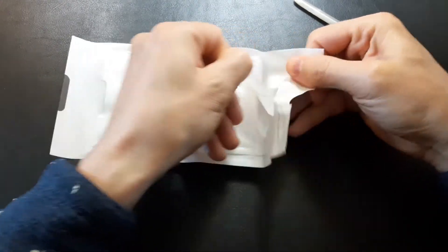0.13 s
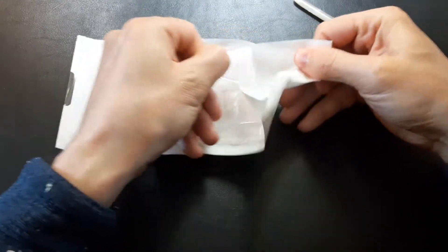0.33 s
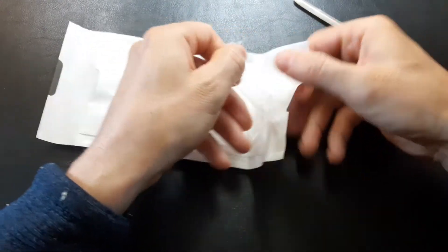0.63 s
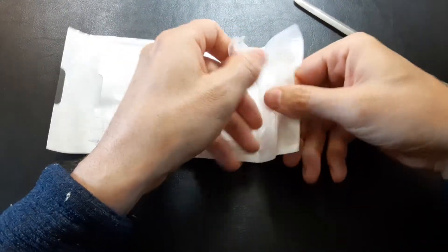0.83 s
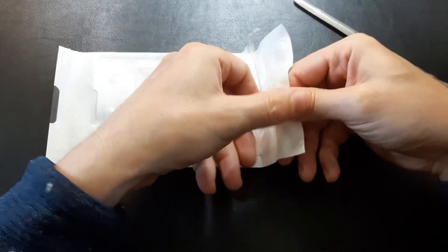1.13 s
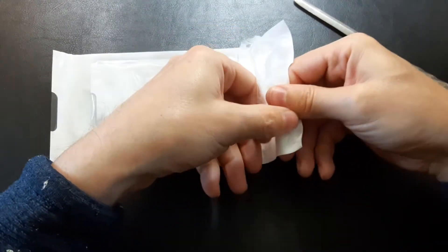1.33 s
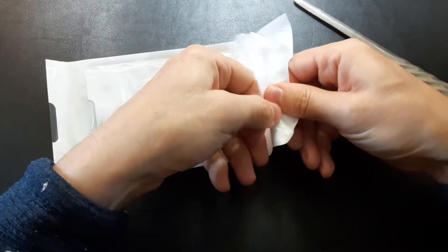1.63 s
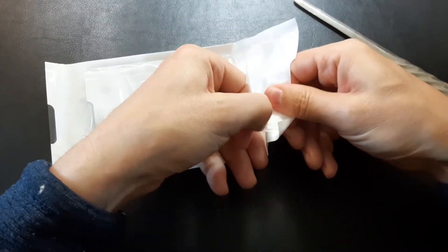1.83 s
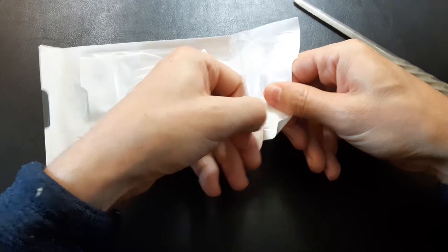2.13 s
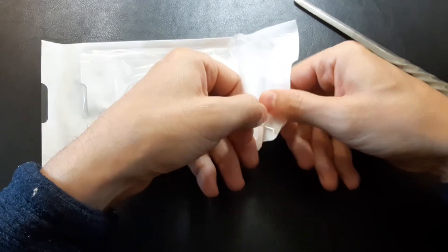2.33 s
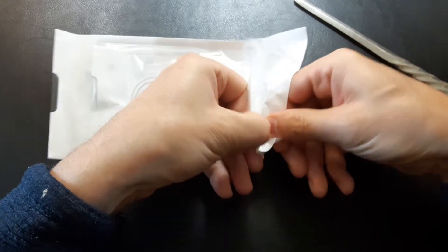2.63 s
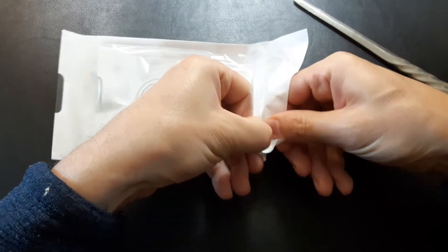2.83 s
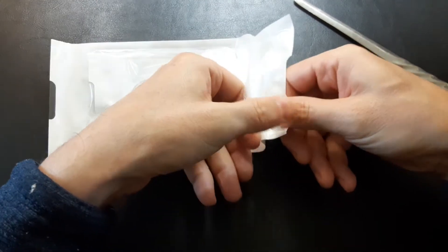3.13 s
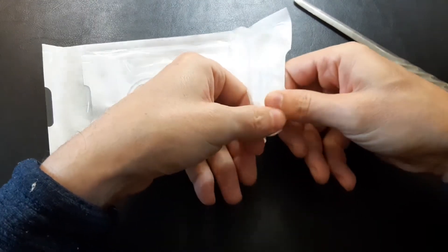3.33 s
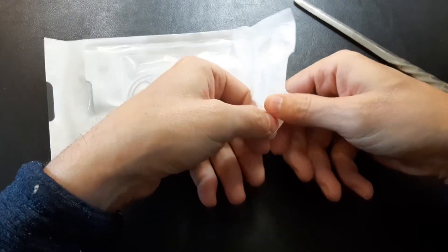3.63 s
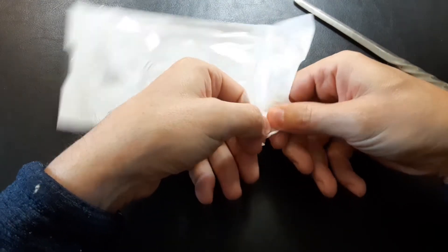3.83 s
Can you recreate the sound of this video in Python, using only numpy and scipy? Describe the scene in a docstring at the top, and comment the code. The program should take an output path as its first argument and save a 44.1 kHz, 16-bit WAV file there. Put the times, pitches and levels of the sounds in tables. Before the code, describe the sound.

A paper and plastic pouch is peeled open close to a stereo microphone in a small room. A loud, dense, bright ripping crackle fills 0 to 0.4 s, with low desk knocks, and a weaker tear follows at 0.5-0.7. Then come quiet finger rustles and sparse dry snaps, small crinkling bursts around 1.7-1.85, 2.3 and 2.5-2.65, and faint ticks and paper rubbing until 4 s, over a very faint steady hush.

```python
"""Peeling a sterile pouch

Two hands peel a paper and plastic pouch open over a desk in a small room. The seal tears in dense runs
of tiny noise bursts. The stiff film snaps in short bursts and pops in brief tones; fingers slide over
the paper as grainy hiss, flaps sing as narrow noise, and the desk knocks in low fading tones.
A short room echo and a faint steady hush lie behind it all."""
import sys
import numpy as np
from scipy import signal
from scipy.fft import rfft, irfft
from scipy.io import wavfile

SR = 44100
rng = np.random.default_rng(int(sys.argv[2]) if len(sys.argv) > 2 else 0)


def generate_wav(sig):
    """Save sig (samples, or channels by samples) to the path in sys.argv[1] as 16-bit PCM at SR."""
    pcm = np.round(np.clip(np.atleast_2d(sig).T, -1, 1) * 32767).astype(np.int16)
    wavfile.write(sys.argv[1], SR, pcm)


N = 176400
TIME = np.arange(N) / SR
EDGES_HZ = 70 * 2 ** (np.arange(17) / 2)   # half-octave band edges

# pulls on the seal, one curve each: [t/s, level of the tearing/dB]
SEAL_PULLS = [
    [(.015, -80), (.032, -42.5), (.075, -26), (.11, -34.5), (.18, -31), (.2, -60), (.235, -33.5),
     (.262, -52), (.305, -28), (.375, -31), (.4, -52)],
    [(.505, -72), (.515, -38.5), (.545, -48.5), (.6, -46.5), (.64, -70)],
    [(1.63, -63), (1.69, -43), (1.742, -36), (1.775, -39.5), (1.82, -51), (1.85, -71)],
    [(2.23, -61), (2.295, -55), (2.33, -68)],
    [(2.52, -47), (2.54, -67), (2.585, -52.5), (2.63, -44.5), (2.66, -89)],
    [(3.0, -73), (3.055, -63), (3.11, -51), (3.16, -64), (3.2, -62)],
]
# colour of the tearing: [f/Hz, level per half octave/dB]
TEAR_COLOUR = [(83, -69), (166, -51), (235, -20), (333, -15.5), (470, -15), (666, -17), (940, -0.5),
               (1330, 4), (1880, -1), (2660, 7), (3770, 7), (5330, 4.5), (7530, -12), (10650, 10.5),
               (15000, 3)]
# low rumble of the handled pouch: [f/Hz, level per half octave/dB]
RUMBLE_COLOUR = [(83, -9.5), (117, -23), (166, -2), (235, -24), (333, 7.5), (470, 6), (940, 4), (3000, -47)]
FIBRES_PER_S, FIBRE_SPREAD_DB, FIBRE_DECAY_S = 1500, 3.8, .0008
PATCHES_PER_S = 14   # how fast the colour of the paper noise shifts

# the film buckles: [t/s, level/dB, body re level/dB, treble re level/dB, decay at 4 kHz/s,
# left minus right/dB]; the levels come before the shared trim, weights, scatter and colour below
FILM_SNAPS = [(0.0246, -41, -35, 10, 0.00041, -1), (0.0651, -27, -13, -4, 0.0025, 4),
              (0.0739, -20, -16, -0.5, 0.00083, 0), (0.0942, -23, -0.5, 2.5, 0.0019, 4.5),
              (0.1211, -21.5, -14, 1, 0.001, -2.5), (0.1342, -35, 0, 2, 0.0025, 7),
              (0.1661, -35, 5.5, 3.5, 0.0034, 5), (0.177, -43.5, 17.5, 5, 0.0033, 0),
              (0.2142, -28.5, -1.5, 0.5, 0.0023, -1.0), (0.225, -31, -32, -3, 0.00083, 0),
              (0.233, -41, 0, 6, 0.0025, -2), (0.2379, -29.5, -16, 6, 0.0012, -0.5),
              (0.272, -33.5, 2.5, 3.5, 0.0047, 0), (0.2938, -23.5, -8.5, -1, 0.0049, 1),
              (0.2996, -47, -9, 10, 0.0015, -1.0), (0.311, -27.5, -25, 3.5, 0.0024, -2),
              (0.3181, -26, -14, -8, 0.0016, -4), (0.3505, -23, -30, -4, 0.004, -1),
              (0.362, -26.5, -18, 0.5, 0.0011, 1), (0.3694, -35, -35, 7, 0.0033, -8),
              (0.3814, -21.5, 2, -1, 0.0034, -0.5), (0.3825, -26.5, -6, -35, 0.0025, 6),
              (0.4962, -44, -2, -9, 0.00075, 4), (0.5084, -30, -3, -24, 0.0024, 0.5),
              (0.5131, -41.5, 0, 7, 0.002, -1), (0.5287, -38, -6, 0, 0.00054, 6),
              (0.5616, -32, -4.5, 10, 0.00085, 3), (0.592, -41, 9, -5.0, 0.0027, 2),
              (0.5991, -37.5, -3, 9, 0.00097, -1), (0.627, -37.5, -41, -0.5, 0.0011, 4),
              (0.7063, -33.5, -26.5, -3.5, 0.00024, -1.5), (1.0451, -50.5, 0, -2.5, 0.0013, -1),
              (1.076, -40.5, -38, -2.5, 0.0015, -2.5), (1.0802, -49, -2, 0, 0.0035, 4),
              (1.1869, -42, -6.5, 2, 0.0018, 0), (1.205, -37, -11.5, 0.5, 0.0025, 1.5),
              (1.2682, -47.5, -5.5, 5, 0.0013, 2), (1.2876, -47.5, -32, -1, 0.0009, 3),
              (1.3009, -38, -10, -4, 0.0009, 1), (1.3185, -51, -3, -4, 0.0008, 1),
              (1.3338, -35.5, -17, -4.5, 0.0014, 1.5), (1.3787, -44.5, -13, 6.5, 0.0013, 0.0),
              (1.405, -39, -11.5, 5.5, 0.0016, 3), (1.4139, -33.5, -20.5, 3.5, 0.00086, 2.5),
              (1.4437, -46.5, -16, -8, 0.0006, 3), (1.4832, -31.5, -32, 5, 0.0014, 0.5),
              (1.6436, -38, -8.5, 0.5, 0.0007, 0.5), (1.7033, -32.5, -8, 9, 0.0013, 0),
              (1.729, -37.5, 3, 8.5, 0.0027, 1), (1.7343, -40, 7.5, 4, 0.0031, 2),
              (1.7489, -35.5, 1.5, -3, 0.0022, -1), (1.8067, -35, -5.5, 0.5, 0.00067, 3),
              (1.8191, -40.5, -2, -5, 0.00072, 0), (1.8433, -44.5, -5, -3, 0.00099, 7),
              (1.8559, -29, -17.5, 4.5, 0.00089, 0), (1.9071, -43, -20, -14, 0.0009, 2),
              (2.0155, -33.5, -21.5, -1.5, 0.00057, 2), (2.1902, -45, -9, -4, 0.0009, -1),
              (2.2358, -39.5, -18, 2.5, 0.00071, 1), (2.2569, -45, -14, 7.5, 0.0006, 6),
              (2.2705, -42.5, 2.5, -3, 0.00065, 1.5), (2.3021, -40.5, 4.5, 3.5, 0.0018, 0),
              (2.4715, -37, -34, -12, 0.0022, 2), (2.4946, -44, -5, 0, 0.00042, 0),
              (2.5246, -28, -12.5, 6, 0.0012, 0), (2.533, -23.5, -20, -6, 0.0017, 1),
              (2.5423, -36.5, -1.5, -3, 0.0016, 1.5), (2.5799, -31.5, -11, 8.5, 0.00097, -0.5),
              (2.6546, -41.5, -21, -41, 0.0017, 3), (2.7126, -36.5, -43, 0, 0.0021, -4),
              (2.7164, -39.5, -42, 3.5, 0.00031, 9), (2.7493, -44, -4.5, -1, 0.0029, 3.0),
              (2.9398, -43.5, -13, -20, 0.0023, 2), (2.9755, -43.5, -20, 3, 0.00051, -2),
              (2.9812, -40, -11, -7, 0.0025, 5.5), (3.0144, -49.5, 3, 0, 0.0015, 4),
              (3.0378, -58.5, -15, 23.5, 0.0008, -2.0), (3.051, -47, 8.5, 10, 0.0047, 2.0),
              (3.077, -35.5, -7.5, -6, 0.0014, -2), (3.1175, -46.5, -2.5, -1, 0.0024, 4),
              (3.1403, -45, -3.0, -7, 0.00068, 2), (3.1589, -41, -7.5, -24, 0.0012, 2.5),
              (3.1724, -42, -5, 1.5, 0.00095, 0), (3.3162, -47.5, -9, -32, 0.0019, 2),
              (3.3552, -43.5, -6, -29, 0.00062, -3), (3.3835, -40, -14, -51, 0.0011, 2),
              (3.5424, -39, -7, -7, 0.0048, 0.5), (3.662, -51.5, -2.5, -15, 0.0025, 1),
              (3.8525, -52, 5.5, -9, 0.00078, 6), (3.8719, -55, -1, 24, 0.00051, 0),
              (3.8921, -35.5, -4.5, -39, 0.0008, 2)]
# colour shared by all snaps: [f/Hz, level per half octave/dB]
SNAP_COLOUR = [(83, -44.5), (235, -27), (470, -16.5), (666, -17), (940, -3), (1330, -4.5), (1880, -4),
               (2660, -7), (3770, -3), (5330, -3), (7530, -9), (10650, -2), (15000, -5.5)]
# the sheet rings on after the crack, less so in the treble: [f/Hz, level re crack/dB]
SNAP_RING = [(900, -10), (3500, -10.5), (12000, -13.5)]
# how much of a snap's body and treble figures each pitch takes: [f/Hz, weight]
BODY_WEIGHT = [(1000, 0.92), (2500, 0.0023)]
TREBLE_WEIGHT = [(4500, 0.0014), (10000, 1)]
SNAP_TRIM_DB, SNAP_SPAN_S = -1, 0.004   # loudness is averaged (rms) over this span
SNAP_RING_S, SNAP_SCATTER_DB = 0.0038, 1
CRACK_SHORTENING = 0.086   # higher bands of a crack die sooner: exponent on frequency
CLICK_DB = 7   # the instant of the flip stands out of its crack

# a taut patch of the pouch flips and rings: [t/s, f/Hz, level/dB, time to fade by 60 dB/s]
FILM_POPS = [(0.2374, 11700, -10.5, .003), (0.3827, 1490, -21.5, 0.02), (.9582, 13700, -34, 0.0036),
             (0.9763, 2340, -41.5, 0.025), (1.0208, 1920, -43.5, 0.0075), (1.1333, 955, -38.5, 0.0027),
             (1.17, 2240, -41, .004), (1.4833, 14200, -8, 0.0032), (1.598, 840, -50, 0.02),
             (2.0155, 3450, -34, 0.013), (2.3025, 885, -26, 0.0095), (2.75, 1740, -31, 0.004),
             (3.543, 2595, -38, 0.027), (3.543, 4400, -39.5, 0.018), (3.978, 1490, -27.5, 0.0032)]

# fingers and flaps slide over the paper: [t/s, level/dB]
SLIDING = [(0, -59), (.1, -34), (.37, -55.5), (.44, -49), (.49, -63), (.57, -48.5), (.66, -50),
           (.71, -52.5), (.82, -55.5), (.87, -54), (.94, -68), (.99, -62), (1.07, -61.5), (1.15, -76),
           (1.2, -57.5), (1.26, -58.5), (1.33, -61), (1.37, -61), (1.45, -57.5), (1.59, -59), (1.73, -60),
           (1.88, -53), (1.96, -62.5), (2.08, -62.5), (2.18, -54), (2.22, -62.5), (2.29, -45.5),
           (2.35, -59.5), (2.42, -66.5), (2.49, -54), (2.58, -49.5), (2.69, -62), (2.76, -58.5),
           (2.855, -71.5), (2.89, -54.5), (2.95, -55.5), (3.0, -62), (3.05, -44), (3.1, -58), (3.17, -60),
           (3.23, -67), (3.29, -66.5), (3.32, -54), (3.38, -56.5), (3.45, -70), (3.485, -57),
           (3.515, -53.5), (3.53, -69), (3.6, -66.5), (3.665, -60), (3.715, -69), (3.76, -56),
           (3.83, -49.5), (3.885, -42), (3.95, -55), (4.0, -49)]
# colour of the sliding: [f/Hz, level per half octave/dB]
SLIDE_COLOUR = [(83, -42.5), (235, -16.5), (470, -14.5), (666, -18), (940, -8), (1330, -8.5), (1880, -1),
                (2660, -2), (3770, 0), (5330, -1.5), (7530, -2.5), (10650, 4), (15000, 0.5)]

# a flap rubs the film and sings: [t at the middle/s, length/s, f/Hz, level before the swell/dB]
FLAP_SWISHES = [(.765, 0.14, 3950, -59), (3.488, .07, 3400, -61), (3.746, 0.095, 3300, -62)]
SWISH_Q = 13   # sharpness of the flap's resonance

# the pouch bumps the desk: [t/s, level/dB, tilt around 200 Hz/dB per octave]
DESK_BUMPS = [(0.179, -37, -11.5), (0.214, -41, 10), (0.301, -35.5, 7), (0.324, -42, 8), (.622, -46, -2),
              (0.654, -53, -2), (0.789, -44.5, 0), (1.134, -54.5, 8), (1.408, -54, 10.5), (1.744, -39.5, 7),
              (1.819, -47.5, 6.5), (2.186, -50, -3), (2.28, -47, 6), (2.58, -45, 5), (3.05, -49.5, -2),
              (3.545, -58.5, 13.5)]
# ringing tones of the desk with the pouch on it: [f/Hz, level/dB, time to fade by 60 dB/s]
DESK_MODES = [(100, -11, 0.067), (160.7, -9.5, 0.16), (348, -3.5, 0.052), (511, -9.5, 0.051)]

# likeness of the two channels: [f/Hz, likeness 0-1]
LIKENESS = [(100, 0.4), (600, 0.67), (1400, 0.69), (2800, 0.43), (5600, 0.3), (11000, 0.46)]
RIGHT_LAG_S = .00002   # the pouch lies a little nearer the left microphone

# strength of the room's echo tail: [f/Hz, level/dB]
ROOM_LEVEL = [(100, -8.5), (700, -13), (3000, -11.5), (7000, -13), (14000, -17)]
# how long the tail lasts: [f/Hz, time to fade by 60 dB/s]
ROOM_T60 = [(100, 0.36), (1000, 0.21), (4000, 0.22), (14000, 0.11)]
# early reflections: [t/s, level/dB]
ROOM_ECHOES = [(.0088, -26), (0.013, -21)]
TAIL_START_S = .008

# colour of the steady hush: [f/Hz, level per half octave/dB]
HUSH_COLOUR = [(83, -2), (166, 7.5), (333, 8), (666, 5), (1330, 13.5), (3770, -4), (7530, -11), (15000, 14)]
HUSH_DB, HUSH_DRIVE = -69.5, 0.82   # the level is for a drive of 1
CUTOFF_HZ = 16300


def tearing_seal(crinkle_db=-3, rumble_db=-21):
    """Paper fibres let go of the film in a dense crackle; the sheet crinkles and rumbles under each pull."""
    pull = sum(level_curve(points) for points in SEAL_PULLS)
    breaks = grains(FIBRES_PER_S, FIBRE_SPREAD_DB, FIBRE_DECAY_S)
    fibres = coloured(pull * breaks, TEAR_COLOUR, patchy_db=0.5)
    creases = crinkles(pull, per_s=420, spread_db=4.5, low_hz=856, high_hz=6500, cycles=10.0, pan_db=15)
    rumble = coloured(pull, RUMBLE_COLOUR)
    return fibres + from_db(crinkle_db) * creases + from_db(rumble_db) * rumble


def film_snaps():
    """Each buckle is a crack with a brief ring of the sheet, in a colour of its own."""
    s, db, body_db, treble_db, decay_s, pan_db = np.transpose(FILM_SNAPS)
    t = TIME[:1024]
    sounds = 0
    for hz, sos in bands():
        fade_speed = (hz / 4000) ** CRACK_SHORTENING
        crack = np.exp(-t / np.maximum(decay_s, 1e-4)[:, None] * fade_speed)
        crack[:, 0] *= from_db(CLICK_DB)
        ring = from_db(at_hz(SNAP_RING, hz)) * np.exp(-t / SNAP_RING_S)
        shape = np.hypot(crack, ring)
        burst = signal.sosfilt(sos, stereo_noise(hz, shape.shape) * shape)
        # bring every burst to the same loudness before setting its level
        energy = (burst ** 2).sum(-1).mean(0)
        burst /= np.sqrt(energy / (SNAP_SPAN_S * SR))[:, None]
        own_db = body_db * at_hz(BODY_WEIGHT, hz) + treble_db * at_hz(TREBLE_WEIGHT, hz)
        scatter_db = SNAP_SCATTER_DB * rng.standard_normal(len(s))
        total_db = SNAP_TRIM_DB + db + own_db + scatter_db + at_hz(SNAP_COLOUR, hz)
        sounds = sounds + burst * from_db(total_db)[:, None]
    out = np.zeros((2, N))
    for k, start in enumerate(s):
        pan = from_db([[pan_db[k] / 2], [-pan_db[k] / 2]])
        add(out, start, sounds[:, k] * pan)
    return out


def film_pops():
    """Each flipping patch rings briefly at a pitch of its own."""
    out = np.zeros(N)
    for s, hz, db, t60 in FILM_POPS:
        add(out, s, from_db(db) * damped_sine(hz, t60))
    return out


def sliding_fingers(crinkle_db=-4, rumble_db=-19):
    """Skin and flaps rub the paper: a fine-grained hiss with small crinkles and a soft rumble."""
    slide = level_curve(SLIDING)
    rubbing = grains(per_s=3400, spread_db=2.5, decay_s=0.0006)
    hiss = coloured(slide * rubbing, SLIDE_COLOUR, patchy_db=2.2)
    creases = crinkles(slide, per_s=100, spread_db=5.0, low_hz=886, high_hz=6080, cycles=13, pan_db=8)
    rumble = coloured(slide, RUMBLE_COLOUR)
    return hiss + from_db(crinkle_db) * creases + from_db(rumble_db) * rumble


def flap_swishes():
    """Soft rubs swell and fade in one narrow resonance of the sheet."""
    out = np.zeros((2, N))
    for s, length_s, hz, db in FLAP_SWISHES:
        swell = np.hanning(int(length_s * SR))
        b, a = signal.iirpeak(hz, SWISH_Q, fs=SR)
        rub = signal.lfilter(b, a, stereo_noise(hz, swell.shape))
        add(out, s - length_s / 2, from_db(db) * swell * rub / rub.std())
    return out


def desk_bumps(contact_s=0.0033):
    """Soft knocks set the low modes of the desk ringing."""
    out, t = np.zeros(N), TIME[:SR // 2]
    for s, db, tilt_db in DESK_BUMPS:
        ring = 0
        for hz, mode_db, t60 in DESK_MODES:
            fading_db = db + mode_db + tilt_db * np.log2(hz / 200) - 60 * t / t60
            ring = ring + from_db(fading_db) * np.sin(2 * np.pi * hz * t)
        soft_start = 1 - np.exp(-(t / contact_s) ** 2)
        add(out, s, ring * soft_start)
    return out


def room(x):
    """A few early reflections and a short diffuse tail that mostly dies sooner in the treble."""
    t = TIME[:SR // 2]
    response = np.zeros((2, N))
    for hz, sos in bands():
        decay = from_db(-60 * t / at_hz(ROOM_T60, hz))
        tail = stereo_noise(hz, t.shape) * decay / np.sqrt(np.sum(decay ** 2))
        add(response, TAIL_START_S, from_db(at_hz(ROOM_LEVEL, hz)) * signal.sosfilt(sos, tail))
    for s, db in ROOM_ECHOES:
        add(response, s, from_db([db]))
    return signal.fftconvolve(x, response[:, :len(t)], axes=1)[:, :N]


def steady_hush():
    """A faint noise that stays at one level."""
    return from_db(HUSH_DB) * coloured(HUSH_DRIVE, HUSH_COLOUR)


def crinkles(drive, per_s, spread_db, low_hz, high_hz, cycles, pan_db):
    """Tiny creases give way at random, each with its own pitch, size and place."""
    out = np.zeros((2, N))
    for when, chance, pitch, size, side in rng.random((4000, 5)):
        if chance >= per_s * TIME[-1] / 4000:   # keep about per_s creases a second
            continue
        s, hz = when * TIME[-1], low_hz * (high_hz / low_hz) ** pitch
        size_gain = from_db(spread_db * min(-np.log(1 - size), 3))
        gain = drive[int(s * SR)] * size_gain * np.sqrt(hz / high_hz)
        pan = from_db(pan_db * (side - .5) * np.array([[1], [-1]]))
        add(out, s, gain * pan * damped_sine(hz, cycles / hz))
    return out


def damped_sine(hz, t60):
    """One mode, struck with height about 1; a small patch radiates little bass."""
    t = TIME[:int(t60 * SR) + 2]
    motion = from_db(-60 * t / t60) * np.sin(2 * np.pi * hz * t)
    return np.diff(motion, prepend=0) / (2 * np.sin(np.pi * hz / SR))


def grains(per_s, spread_db, decay_s):
    """Envelope of random tiny breaks, each with an instant attack and a short decay; rms 1."""
    sizes = from_db(spread_db * np.minimum(rng.exponential(1, N), 4))
    breaks = (rng.random(N) < per_s / SR) * sizes ** 2
    power = signal.lfilter([1], [1, -np.exp(-2 / (decay_s * SR))], breaks + 1e-18)
    return np.sqrt(power / power.mean())


def coloured(drive, colour, patchy_db=0):
    """A drive envelope shapes noise in every band, each can swell on its own; drive 1 gives rms about 1."""
    out, power = 0, 0
    for hz, sos in bands():
        gain = from_db(at_hz(colour, hz))
        share = hz * (2 ** .25 - 2 ** -.25) / (SR / 2)   # the band's part of white noise power
        swell = from_db(patchy_db * drift(PATCHES_PER_S)) if patchy_db else 1
        noise = stereo_noise(hz, (N,)) * (drive * swell + 1e-12)
        out = out + gain / np.sqrt(share) * signal.sosfilt(sos, noise)
        power += gain ** 2
    return out / np.sqrt(power)


def drift(per_s):
    """Slow smooth chance; spread about 1."""
    knots = rng.standard_normal(int(2 * per_s * TIME[-1]) + 2)
    return signal.resample(knots, N)


def stereo_noise(hz, shape):
    """White noise in two channels, as alike as they are at this frequency."""
    mid, side = rng.standard_normal((2, *shape))
    alike = np.clip(at_hz(LIKENESS, hz), 0, .99)
    mid, side = mid * np.sqrt((1 + alike) / 2), side * np.sqrt((1 - alike) / 2)
    return np.array([mid + side, mid - side])


def bands():
    """Half-octave band-passes with their centres."""
    pairs = []
    for lo, hi in zip(EDGES_HZ, EDGES_HZ[1:]):
        sos = signal.butter(2, [lo, hi], "band", fs=SR, output="sos")
        pairs.append((np.sqrt(lo * hi), sos))
    return pairs


def level_curve(points):
    """Gain along a [t/s, level/dB] curve, silent outside it."""
    s, db = np.transpose(points)
    return from_db(np.interp(TIME, s, db)) * (TIME >= s[0]) * (TIME <= s[-1])


def at_hz(points, hz):
    """Read a table on a log-frequency axis."""
    f, value = np.transpose(points)
    return np.interp(np.log(hz), np.log(f), value)


def from_db(db):
    """Decibels to gain."""
    return 10 ** (np.asarray(db) / 20)


def add(out, s, sound):
    """Mix a sound in at a time in seconds."""
    start = max(int(s * SR), 0)
    out[..., start:start + sound.shape[-1]] += sound[..., :max(N - start, 0)]


def delayed(x, lag_s):
    """Delay by a fraction of a sample, by turning the phase of each frequency."""
    hz = np.arange(N // 2 + 1) * SR / N
    return irfft(rfft(x) * np.exp(-2j * np.pi * hz * lag_s), N)


def scene():
    """The pouch close by, its room, and a faint steady hush."""
    film = film_snaps() + film_pops()
    paper = tearing_seal() + sliding_fingers()
    left, right = film + paper + flap_swishes() + desk_bumps()
    pouch = np.array([left, delayed(right, RIGHT_LAG_S)])
    return pouch + room(pouch) + steady_hush()


def record(dry, low_cut_hz=54):
    """The deep bass is rolled off and the top is cut steeply."""
    low_cut = signal.butter(2, low_cut_hz, "high", fs=SR, output="sos")
    top_cut = signal.ellip(10, .1, 70, CUTOFF_HZ, fs=SR, output="sos")
    return signal.sosfilt(top_cut, signal.sosfilt(low_cut, dry))


dry = scene()
out = record(dry)
generate_wav(out)
```